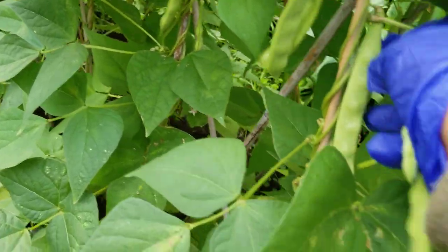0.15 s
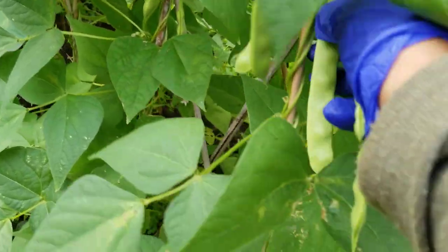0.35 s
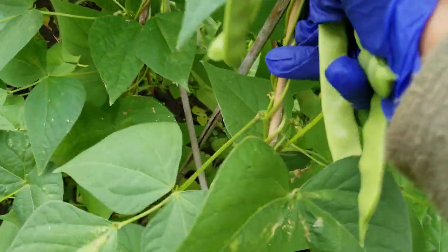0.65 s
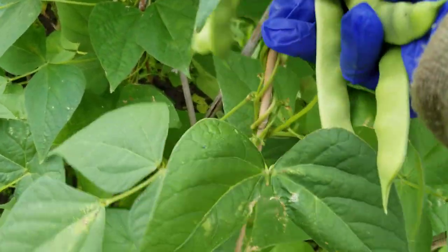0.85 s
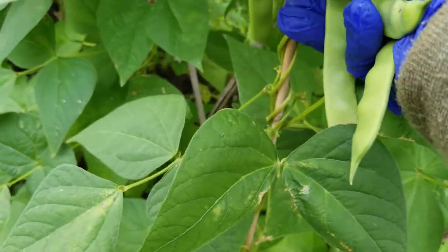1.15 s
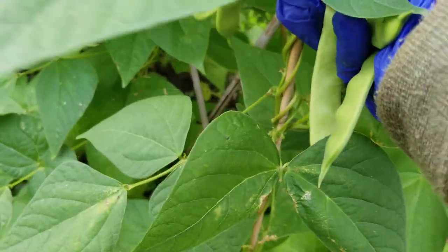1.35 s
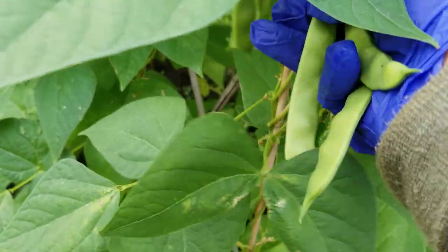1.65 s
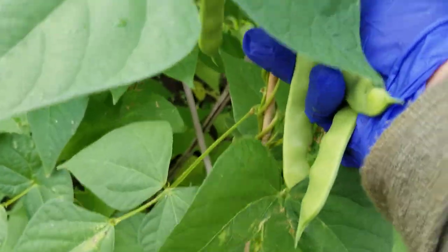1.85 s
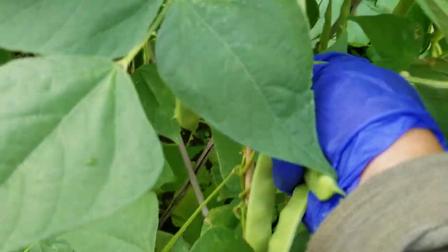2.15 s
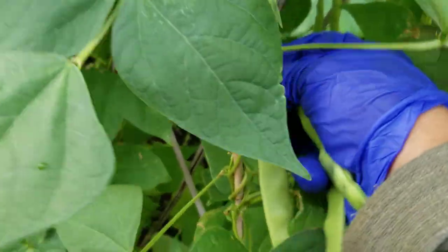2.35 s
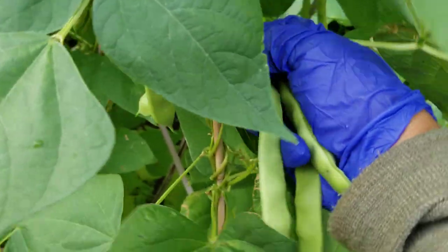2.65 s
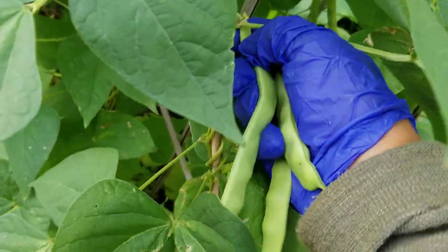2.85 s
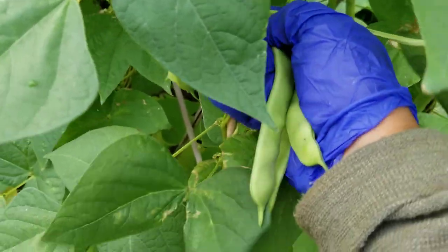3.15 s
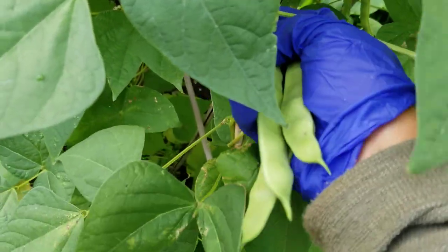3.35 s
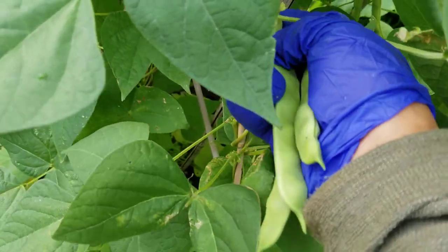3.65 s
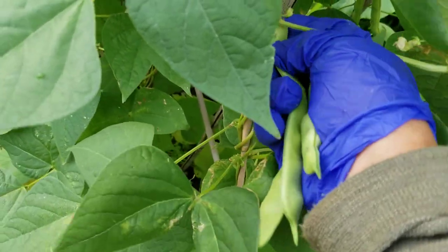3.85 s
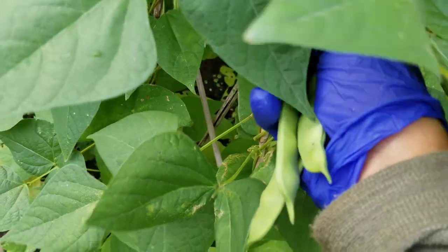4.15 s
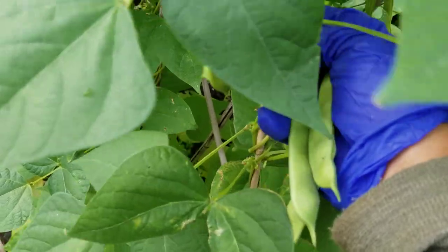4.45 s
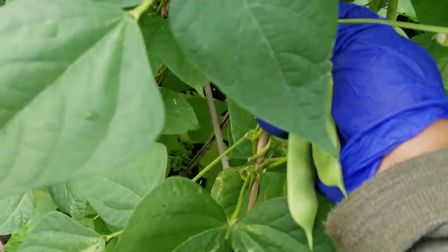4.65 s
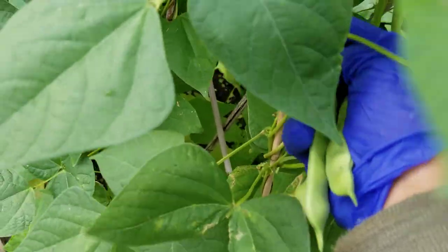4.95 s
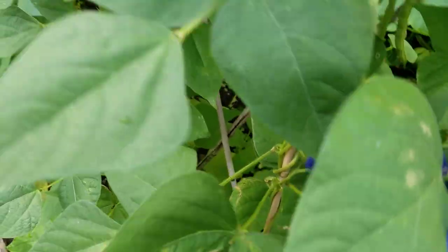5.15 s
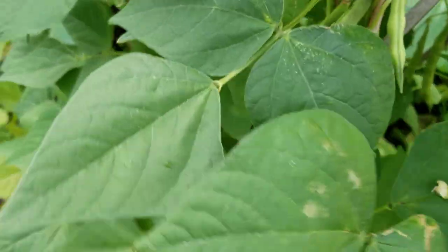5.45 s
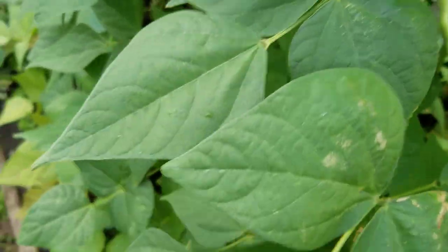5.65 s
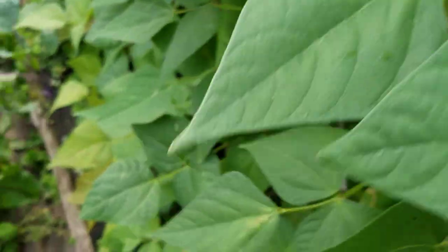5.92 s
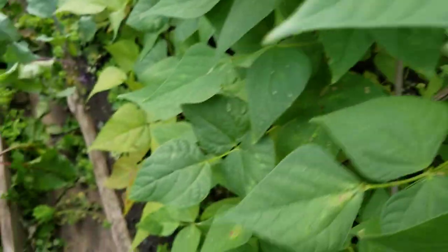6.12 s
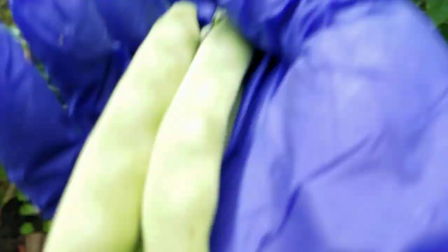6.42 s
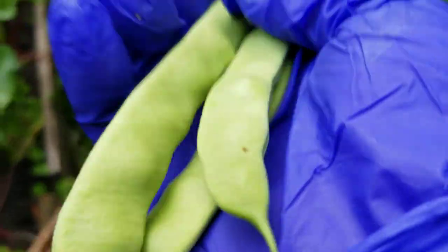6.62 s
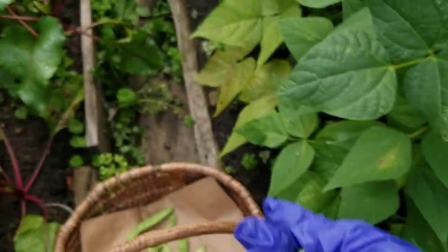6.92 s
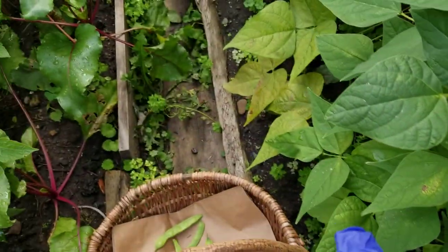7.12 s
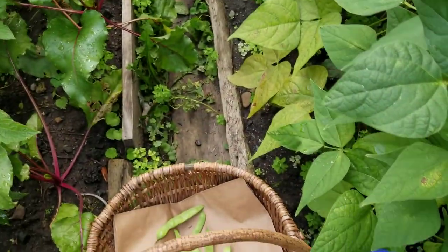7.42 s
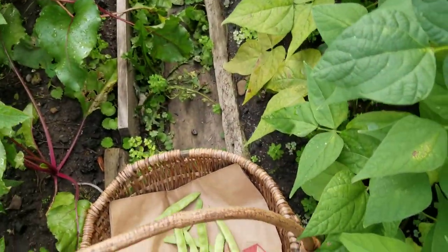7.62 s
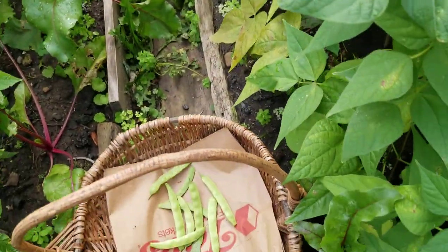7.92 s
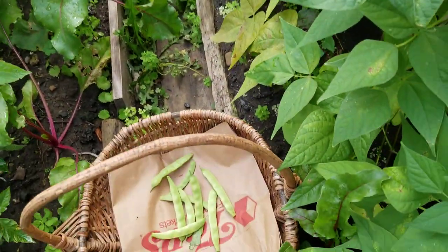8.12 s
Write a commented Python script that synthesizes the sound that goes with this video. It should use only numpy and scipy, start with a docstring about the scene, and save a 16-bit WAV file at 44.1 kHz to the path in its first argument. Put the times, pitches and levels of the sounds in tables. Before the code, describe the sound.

Bean pods snap off their vines amid close leaf rustle, then drop onto a paper bag in a basket, over a faint hum.

```python
"""A gloved hand picks bean pods from a garden vine, close to a phone. Glove and leaves crinkle in tiny
grains over a scratchy hiss; stems snap with a short ring, a crack and a knock of the pod. Then the
handful falls on a paper bag in a basket and bounces. Far traffic, a thin garden hiss and a machine's hum
lie behind. The lens motor ticks as the phone swings; its two microphones sit a few centimetres apart."""
import sys
import numpy as np
from scipy import signal
from scipy.fft import rfft, irfft, next_fast_len
from scipy.io import wavfile
from scipy.ndimage import uniform_filter1d, map_coordinates

SR = 44100
rng = np.random.default_rng(int(sys.argv[2]) if len(sys.argv) > 2 else 0)


def inscribe(sig):
    """Save sig as 16-bit PCM at rate SR to the path in sys.argv[1].

    A 1-D sig is mono; a 2-D sig holds one channel per row.
    Samples are clipped to [-1, 1] before scaling.
    """
    pcm = np.round(np.clip(np.atleast_2d(sig).T, -1, 1) * 32767)
    wavfile.write(sys.argv[1], SR, pcm.astype(np.int16))


N = 365141


def amp(db):
    return 10 ** (np.asarray(db) / 20)


def unit(x):
    return x / np.sqrt(np.mean(x ** 2) + 1e-20)


def sine(hz, t, phase=0):
    return np.sin(2 * np.pi * hz * t + phase)


def decay(t, t60_s):
    return amp(-60 * t / t60_s)


def add(track, start_s, sound):
    track[..., round(start_s * SR):][..., :sound.shape[-1]] += sound


def along(points, hz):
    """Interpolate (freq_hz, value) points on a log axis."""
    freqs, values = np.transpose(points)
    return np.interp(np.log(hz + 1), np.log(freqs + 1), values)


def curves(rows):
    """One value per sample for each column after time_s."""
    time_s, *columns = np.transpose(rows)
    return [np.interp(np.arange(N) / SR, time_s, column) for column in columns]


def wobble(rate_hz):
    """Smooth random curve, rate_hz knots a second."""
    knots = rng.standard_normal(int(N * 400 / SR) + 4)
    return map_coordinates(knots, [np.arange(N) * rate_hz / SR])


def filtered(x, response):
    """Apply a complex frequency response."""
    size = next_fast_len(N + 8192)
    return irfft(rfft(x, size) * response(np.fft.rfftfreq(size, 1 / SR)), size)[..., :N]


def noise(spectrum):
    """Coloured noise, rms 1."""
    return unit(filtered(rng.standard_normal(N), lambda hz: amp(along(spectrum, hz))))


def spread(shared, left, right, alike):
    """Two channels with a share of their power in common."""
    return np.sqrt(alike) * shared + np.sqrt(1 - alike) * np.array([left, right])


def stereo_noise(spectrum, alike):
    return spread(noise(spectrum), noise(spectrum), noise(spectrum), alike)


def crinkle(pitch_hz, count=9000):
    """Dense, tiny damped grains scattered about a pitch."""
    place, strength, polarity = rng.random((count, 3)).T
    starts = (place * N).astype(int)
    hz = pitch_hz[starts] * np.exp(.17 * rng.standard_normal(count))
    size = amp(-2.5 * np.log(strength)) * np.sign(polarity - .5)
    offsets = np.arange(160)
    cycles = hz[:, None] * offsets / SR
    grains = size[:, None] * np.sin(2 * np.pi * cycles) * np.exp(-cycles / 2.2)
    grains *= 1 - np.exp(-cycles / .8)
    return unit(np.bincount((starts[:, None] + offsets).ravel(), grains.ravel(), N)[:N])


def scratches(per_s, t60_s, depth_db):
    """Envelope of random sharp onsets that die away."""
    onsets = (rng.random(N) < per_s / SR) * amp(depth_db * rng.uniform(-2, 2, N))
    return signal.lfilter([1], [1, -decay(1 / SR, t60_s)], onsets)


def patchy(pair, depth_db):
    """Louder and softer patches over time and pitch, as one leaf after another sounds."""
    spectra = signal.stft(pair, nperseg=256)[2]
    field = uniform_filter1d(rng.standard_normal(spectra.shape[1:]), size=6, axis=0)
    field = uniform_filter1d(field, size=10, axis=1)
    return signal.istft(spectra * amp(depth_db * unit(field)), nperseg=256)[1][:, :N]


# hand among the leaves: time_s, crinkle_db, hiss_db, crinkle_pitch_hz
HAND_MOTION = [(0, -67, -58.5, 2600), (.5, -56.5, -55.5, 2600), (.85, -54.5, -52.5, 2600),
               (1.1, -61, -59.5, 2450), (1.4, -60.5, -60.5, 2650), (1.9, -69, -65, 2700),
               (2.3, -65.5, -58.5, 2200), (2.48, -57, -55, 2850), (2.65, -63, -58.5, 2200),
               (2.95, -67, -57, 2200), (3.15, -62, -64.5, 2200), (3.4, -57.5, -55, 2200),
               (3.58, -71.5, -65, 2100), (4.05, -61, -57.5, 2150), (4.68, -65.5, -59, 2250),
               (5.05, -60, -52.5, 2700), (5.19, -50, -49, 2650), (5.56, -56, -48.5, 2100),
               (5.63, -62, -64, 2100), (5.92, -79, -64.5, 2185), (6.12, -91, -68.5, 2100),
               (7.38, -81.5, -70.5, 2000)]
# leaves flicked or let go: start_s, crinkle_db, hiss_db, t60_s
LEAF_FLICKS = [(.055, -65, -63, .11), (0.269, -32.5, -42, 0.037), (0.335, -43, -57, 0.11),
               (0.961, -47, -49, 0.078), (1.24, -68, -54, 0.14), (1.608, -58, -49, 0.11),
               (2.31, -44.5, -48, 0.069), (2.481, -38.5, -40, 0.12), (2.569, -51, -32.5, 0.035),
               (3.08, -46, -37, 0.073), (3.087, -40, -38.5, 0.21), (3.25, -55, -46.5, 0.11),
               (3.574, -57, -44.5, 0.12), (4.219, -56, -43, 0.081), (4.36, -79, -60, 0.4),
               (4.764, -48, -37.5, 0.047), (5.14, -49.5, -48, 0.22), (5.255, -49, -48, 0.2),
               (5.608, -54, -41, 0.059), (5.71, -70, -64, 0.11), (6.71, -82, -57, 0.29),
               (7.914, -70.5, -69, 0.028), (7.985, -71, -80, .06), (8.175, -68, -59, 0.068)]
# strokes along a leaf: middle_s, length_s, crinkle_db, hiss_db
LEAF_STROKES = [(0.077, 0.078, -57, -54.5), (0.28, 0.27, -60, -58), (0.973, 0.13, -52, -78),
                (1.54, 0.2, -65, -68), (1.747, 0.26, -55, -53), (2.484, 0.24, -59.5, -65),
                (3.242, 0.29, -70, -52.5), (3.828, 0.071, -55, -55), (4.27, 0.062, -60, -53.5),
                (4.525, 0.14, -64, -55.5), (4.925, 0.1, -74, -52.5), (5.27, 0.05, -71, -54),
                (5.44, 0.32, -57, -68), (6.41, 0.25, -88, -72), (6.62, 0.3, -90, -73),
                (7.162, 0.22, -96, -57)]
# leaf hiss: freq_hz, density_db
LEAF_SPECTRUM = [(410, -42.5), (700, -11.5), (908, 1.5), (1390, -7.5), (1900, -2.5), (3040, -2),
                 (3690, -6.5), (5590, -5.5), (9280, -12.5), (12300, -8), (15600, -8.5)]


def rustle():
    """Glove and leaves crinkle in clumps over a leaf hiss; many leaves sound, so the channels differ."""
    crinkle_db, hiss_db, pitch_hz = curves(HAND_MOTION)
    clumps = amp(1.3 * wobble(35))
    moves, t = np.zeros((2, N + SR)), np.arange(SR // 3) / SR  # rows: crinkle, hiss
    for start_s, *levels_db, t60_s in LEAF_FLICKS:
        add(moves, start_s, amp(np.c_[levels_db]) * decay(t, t60_s) * (1 - np.exp(-t / .004)))
    for middle_s, length_s, *levels_db in LEAF_STROKES:
        swell = signal.windows.tukey(round(length_s * SR), .65)
        add(moves, max(middle_s - length_s / 2, 0), amp(np.c_[levels_db]) * swell)
    glove = unit(clumps * spread(crinkle(pitch_hz), crinkle(pitch_hz), crinkle(pitch_hz), alike=.41))
    roughness = 1 + .3 * scratches(per_s=57, t60_s=.036, depth_db=4)
    leaves = unit(clumps * roughness * patchy(stereo_noise(LEAF_SPECTRUM, alike=.18), depth_db=2.5))
    return (amp(crinkle_db) + moves[0, :N]) * glove + (amp(hiss_db) + moves[1, :N]) * leaves


# far background: time_s, level_db
BACKGROUND_LEVEL = [(0, -47.5), (.5, -48), (4.7, -48.5), (5.35, -47.5), (6, -48.5), (6.4, -48),
                    (6.9, -48.5), (7.55, -48.5), (7.75, -51), (8.28, -52)]
# traffic rumble: freq_hz, density_db
TRAFFIC_SPECTRUM = [(15, -64), (25, -51), (43, -17), (65, -2), (156, -12), (192, -15.5), (224, -13.5),
                    (295, -20.5), (356, -14), (408, -18), (437, -17), (575, -21), (1500, -35.5),
                    (1950, -61.5), (3300, -120)]
# traffic rumble: freq_hz, left_right_correlation
TRAFFIC_CORRELATION = [(40, .86), (90, .88), (200, .96), (550, .75), (1650, -.6)]


def traffic():
    """Broad far rumble, alike at both microphones only in the bass."""
    def mid_side_response(hz):
        angle = np.arccos(along(TRAFFIC_CORRELATION, hz)) / 2
        return amp(along(TRAFFIC_SPECTRUM, hz)) * [np.cos(angle), np.sin(angle)]

    level_db, = curves(BACKGROUND_LEVEL)
    mid, side = filtered(rng.standard_normal((2, N)), mid_side_response)
    return amp(level_db + .9 * wobble(4.2)) * unit(np.array([mid + side, mid - side]))


# garden hiss: freq_hz, density_db
GARDEN_SPECTRUM = [(760, -48), (1300, -17), (1730, -2), (2080, -1.5), (2360, -18), (2790, -8.5),
                   (3040, -16), (3990, -8.5), (5760, -7.5), (6950, -38), (8940, -28.5), (13400, -7.5),
                   (15900, -18)]
# garden hiss: freq_hz, left_minus_right_db
GARDEN_BALANCE = [(1000, 3), (1900, 6), (2800, -3), (4200, -10), (4800, 4), (5800, 4), (7000, 1),
                  (9500, -5), (15000, -2)]


def garden_hiss(relative_db=-19):
    """Thin far hiss that follows the background level, coloured differently on each side."""
    level_db, = curves(BACKGROUND_LEVEL)
    gain = amp(level_db + relative_db + 1.4 * wobble(5))
    pair = np.array([noise(GARDEN_SPECTRUM), noise(GARDEN_SPECTRUM)])
    return gain * filtered(pair, lambda hz: amp([[.5], [-.5]] * along(GARDEN_BALANCE, hz)))


# machine tones: pitch_hz, rms_db, waver_rad
HUM_TONES = [(61.5, -54, 1.6), (220.7, -64, .9), (355, -65, 2.5), (441, -59.5, .35)]
# upper machine tones: time_s, gain_db
OVERTONE_FADE = [(0, -3), (5.5, 1.5), (6.8, -5.5), (7.4, -16.5), (8.28, -9)]


def machine_hum():
    """A far machine's tones waver in level and phase; the upper ones fade late on."""
    t = np.arange(N) / SR
    base, *overtones = [np.sqrt(2) * amp(rms_db + .45 * wobble(3.6)) * sine(hz, t, waver_rad * wobble(9))
                        for hz, rms_db, waver_rad in HUM_TONES]
    fade_db, = curves(OVERTONE_FADE)
    return base + amp(fade_db) * sum(overtones)


# stems and tendrils breaking:
# start_s, level_db, pitch_hz, crack_re_ring_db, knock_re_ring_db, left_minus_right_db
STEM_BREAKS = [(0.0648, -30.5, 2830, -6.5, -21, -5), (.2991, -32, 3010, -14, -4, -2),
               (0.6411, -33, 2720, -20, -5, -11), (1.148, -39, 1920, -6.5, -22, .5),
               (1.2081, -41.5, 1880, 6.5, -25, 0), (1.612, -47, 1900, 7, -14, 9),
               (2.062, -52, 2900, 2, -20, 0), (2.1201, -40, 1990, -4.5, 1, 4),
               (2.3326, -42, 1970, -10, 15, 2), (2.4699, -31.5, 3080, -16, 6, 2),
               (2.5683, -23.5, 2120, -19, -26, -0.5), (2.845, -46.5, 1890, -5.5, 4.5, 19),
               (3.0876, -12, 1920, -15, -12, 3), (3.101, -27, 1930, -5, -7, 2),
               (3.1072, -25, 1920, -28, 2.5, 0), (3.125, -33, 1740, -18, -10, -3),
               (3.2839, -28, 2130, -11.5, -2.5, 3), (3.4201, -37.5, 2080, -11, -5, 11),
               (3.5745, -48, 3120, 3, -14, 2), (3.9262, -40, 1850, -6, -11, 1.5),
               (3.951, -46, 3000, -2, -20, 0), (4.09, -45, 2500, -6, -20, 0),
               (4.152, -52, 2300, -13, -20, 2), (4.22, -30, 2340, -14, -14, 6),
               (4.7354, -6.5, 2970, -10.5, -18, 2), (4.8016, -24, 1940, -7.5, -2, 1),
               (5.1408, -27.5, 2460, -12, -14, 3), (5.307, -35, 2660, -15, -14, -10),
               (5.3862, -29, 2160, -13, -2, 1), (5.4146, -28, 1950, -17.5, -6, 4),
               (5.4999, -39.5, 2400, -1, -7, 5), (5.611, -37, 2010, -16, -17, 13),
               (5.639, -38, 2720, -3, -14, 0)]


def stem_snaps(ring_cycles=1.87, hard_break_db=-51.5, echo_db=-23.5):
    """A break rings four stem modes, cracks fibres, knocks the pod and echoes among the leaves."""
    out, t = np.zeros((2, N + SR)), np.arange(SR // 12) / SR
    for start_s, level_db, hz, crack_db, knock_db, pan_db in STEM_BREAKS:
        modes = sine(hz, t) + .26 * sine(.69 * hz, t) + .4 * sine(1.26 * hz, t) + .46 * sine(1.6 * hz, t)
        ring = modes * np.exp(-t * hz / ring_cycles) * (1 - np.exp(-t * hz / .36))
        knock_hz = 497 + 14 * max(level_db - hard_break_db, 0)  # harder breaks knock higher
        knock = sine(knock_hz, t) * np.exp(-t * knock_hz / .48) + .22 * sine(290, t) * decay(t, .013)
        fibres = spread(*rng.standard_normal((3, len(t))), alike=.4)
        crack = amp(crack_db) * fibres * (decay(t, .0079) + .4 * decay(t, .0032))
        foliage = rng.standard_normal((2, len(t))) * decay(t, .05)
        echo = signal.fftconvolve(foliage, .49 * ring + .52 * crack, axes=1)[:, :len(t)]
        snap = ring + amp(knock_db) * knock + crack + amp(echo_db) * echo
        add(out, start_s, amp(level_db) * snap * amp([[pan_db / 2], [-pan_db / 2]]))
    return out[:, :N]


def lens_motor(start_s=5.8155, end_s=7.06, steps_per_s=30, level_db=-53):
    """As the phone swings, its lens motor ticks faintly and unevenly beside the right microphone."""
    out, t = np.zeros((2, N)), np.arange(SR // 100) / SR
    tick = sine(3950, t) * decay(t, .0035) + amp(-4) * sine(2300, t) * decay(t, .003)
    for step_s in np.arange(start_s, end_s, 1 / steps_per_s):
        jitter, strength = rng.standard_normal(2)
        add(out[1], step_s + .0012 * jitter, amp(level_db + 4 * strength) * tick)
    return out


# pods landing on the bag: start_s, thud_db, thud_hz, flap_db, crackle_db
POD_LANDINGS = [(7.4126, -1, 330, -33, -36), (7.4186, 7, 476, -17.5, -18), (7.4357, 6.5, 640, -20, -12),
                (7.441, 1, 306, -31, -37), (7.449, -5, 324, -12, -19), (7.451, -17, 400, -37, -15),
                (7.471, -13.5, 300, -26, -27), (7.521, -42.5, 398, -53, -61), (7.529, -15, 343, -54, -69),
                (7.574, -27, 470, -56, -69), (7.587, -33, 402, -46, -50), (7.598, -17.5, 452, -46, -49),
                (7.604, -21, 347, -63, -42), (7.615, -14, 294, -44.5, -43), (7.655, -25, 437, -51, -58),
                (7.696, -32, 500, -68, -56)]
# loose fold of the bag: freq_hz, density_db
FLAP_SPECTRUM = [(900, -67.5), (1300, -12), (2100, -1), (2800, -9), (3600, -59)]
# paper crackle: freq_hz, density_db
CRACKLE_SPECTRUM = [(350, -41), (600, -9.5), (1350, -6.5), (2070, -0.5), (2830, -10.5), (3680, -9),
                    (4050, -9.5), (5260, -7.5), (9360, -16.5), (11300, -15), (16000, -13.5)]


def pod_drops(paper_t60_s=.037, low_cut_hz=60):
    """Each pod thumps bag and basket for a few low cycles; the paper flaps and crackles."""
    thuds, t = np.zeros(N + SR), np.arange(SR // 4) / SR
    paper = np.zeros((2, N + SR))  # rows: flap, crackle
    tails = np.array([[.025], [.04]]) * decay(t, .25)
    paper_envelope = (decay(t, paper_t60_s) + tails) * (1 - np.exp(-t / .001))
    for start_s, thud_db, hz, flap_db, crackle_db in POD_LANDINGS:
        push = sine(hz, t) + .45 * sine(1.7 * hz, t, 2 * np.pi * rng.random())
        boom = .16 * sine(150, t) * decay(t, .016)
        thud = (push * np.exp(-t * hz / .53) + boom) * (1 - np.exp(-t * hz / .5))
        add(thuds, start_s, -amp(thud_db) * thud)
        add(paper, start_s, amp([[flap_db], [crackle_db]]) * paper_envelope)
    flap = paper[0, :N] * stereo_noise(FLAP_SPECTRUM, alike=.58)
    crackle = paper[1, :N] * amp(1.2 * wobble(390)) * stereo_noise(CRACKLE_SPECTRUM, alike=.25)
    wicker = spread(*rng.standard_normal((3, len(t))), alike=1) * decay(t, .15)
    thumps = thuds[:N] + amp(-36.5) * signal.fftconvolve(thuds[None], wicker, axes=1)[:, :N]
    # no deep bass from a small basket
    return filtered(thumps, lambda hz: (1j * hz / (low_cut_hz + 1j * hz)) ** 2) + flap + crackle


# delay between the microphones: time_s, left_lag_ms
PORT_LAG = [(0, 0.34), (1.5, 0.22), (3, 0.23), (5, 0.25), (5.8, 0.096), (6.6, -0.23), (7.2, 0.062),
            (8.28, 0.18)]
# port colouring of near sounds: freq_hz, left_minus_right_db
PORT_BALANCE = [(60, -1.5), (130, 0.5), (290, -5), (640, -2.5), (1410, 6.5), (3100, 1.5), (6820, -5.5),
                (15000, -3)]


def microphone_ports(pair):
    """Near sound reaches one port later, by the angle of the phone; each port colours it."""
    lag_ms, = curves(PORT_LAG)
    side = np.array([[.5], [-.5]])
    positions = np.arange(N) - side * lag_ms * SR / 1000
    delayed = np.array([map_coordinates(channel, [at]) for channel, at in zip(pair, positions)])
    return filtered(delayed, lambda hz: amp(side * along(PORT_BALANCE, hz)))


def scene():
    near = microphone_ports(rustle() + stem_snaps() + pod_drops())
    return near + traffic() + garden_hiss() + machine_hum() + lens_motor()


def record(dry):
    """The phone keeps nothing above its band limit."""
    top_hz, edge_hz = 16050, 250
    return filtered(dry, lambda hz: np.clip((top_hz - hz) / edge_hz, 0, 1))


dry = scene()
out = record(dry)
inscribe(out)
```